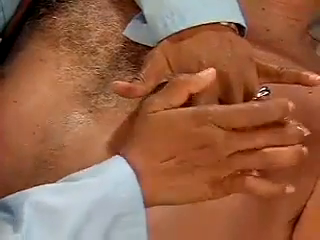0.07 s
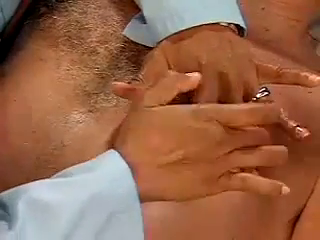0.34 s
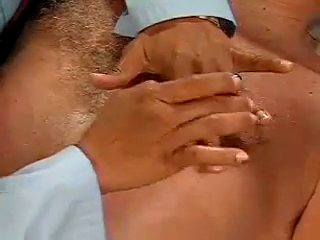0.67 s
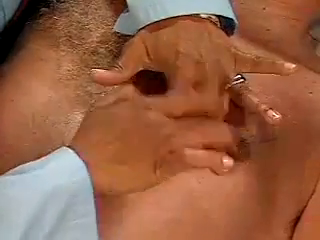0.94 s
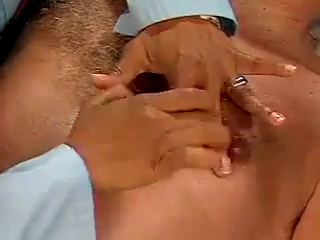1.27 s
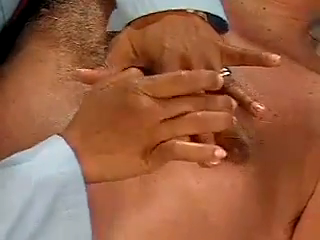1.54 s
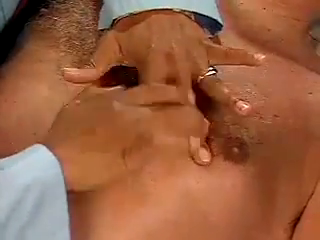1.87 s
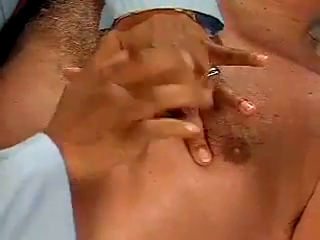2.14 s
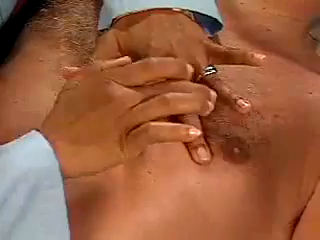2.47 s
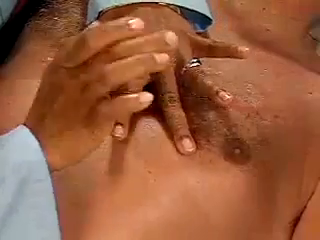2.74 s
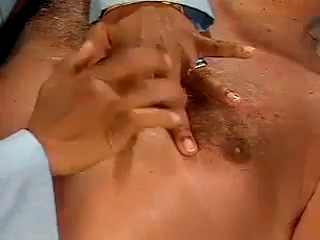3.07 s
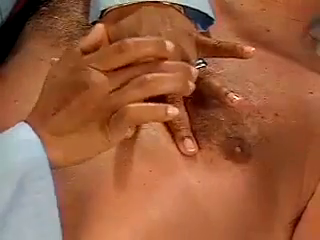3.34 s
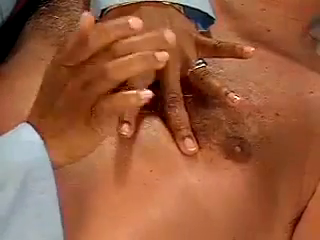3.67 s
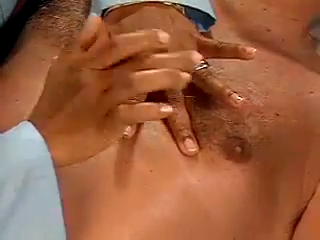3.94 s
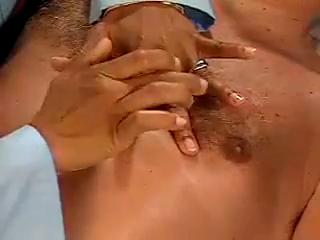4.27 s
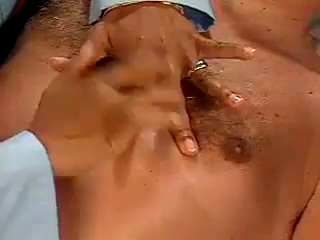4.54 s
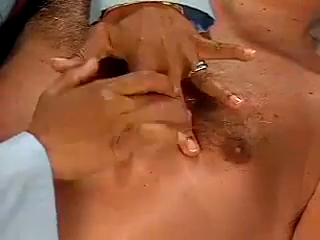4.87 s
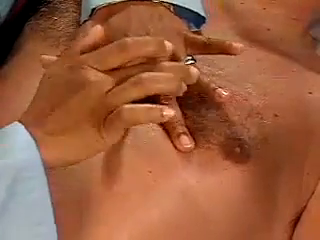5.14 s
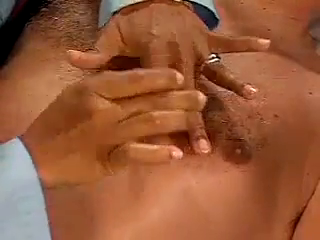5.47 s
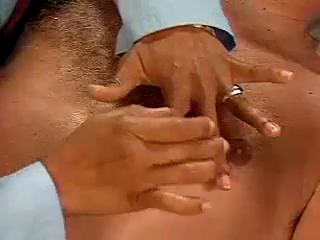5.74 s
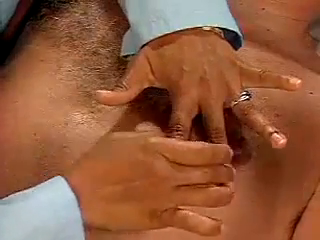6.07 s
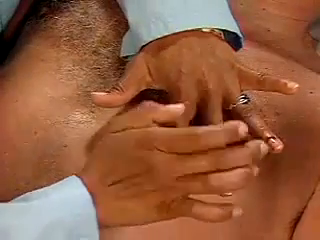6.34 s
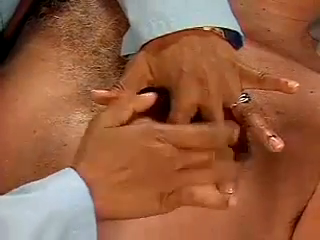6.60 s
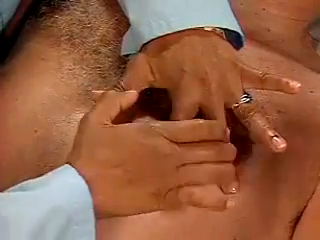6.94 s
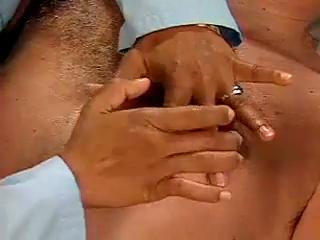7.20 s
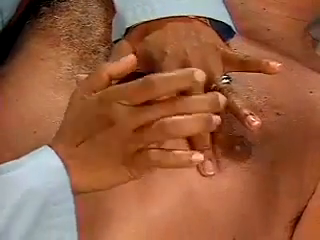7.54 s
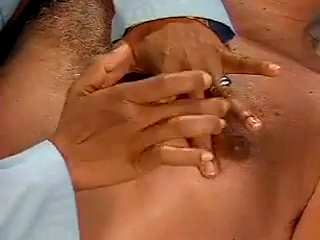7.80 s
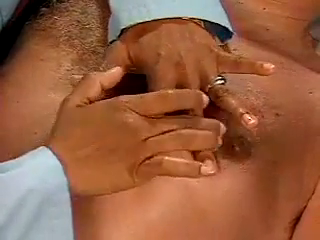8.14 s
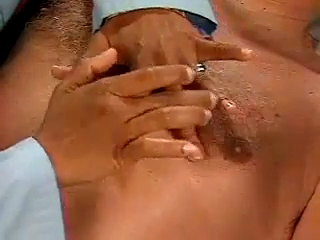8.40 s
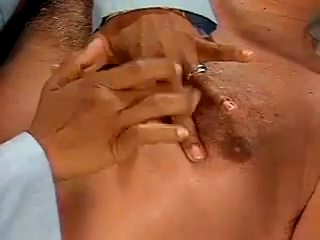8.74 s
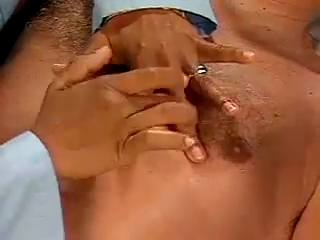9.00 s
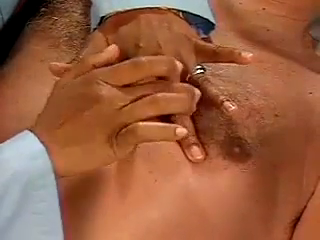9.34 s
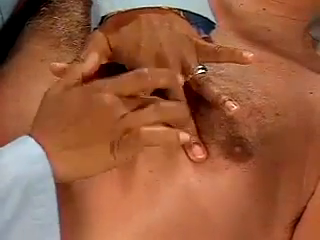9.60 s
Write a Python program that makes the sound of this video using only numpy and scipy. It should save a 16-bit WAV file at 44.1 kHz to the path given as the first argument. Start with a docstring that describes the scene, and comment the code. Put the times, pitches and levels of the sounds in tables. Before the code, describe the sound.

A fingertip strikes a finger laid flat on a bare chest, heard close in a small quiet room. One tap is followed by five quick pairs, a short pause, then four more pairs. Each tap combines a light skin snap, a bony knock and a hollow thump. Fingers occasionally brush together, and a hand and cotton cuff rub faintly between taps. Ventilation rumbles steadily underneath.

```python
"""Chest percussion in a small quiet room.

A fingertip strikes a finger laid flat on the ribs, mostly in pairs of taps. Each tap is a skin snap,
a bony knock and a hollow thump of chest wall and lung. Fingers brush as they lift; hand and cuff rub
on the way to the next spot. Ventilation rumbles steadily underneath."""
import sys
import numpy as np
from scipy import signal
from scipy.fft import rfft, irfft
from scipy.io import wavfile

SR = 44100
rng = np.random.default_rng(int(sys.argv[2]) if len(sys.argv) > 2 else 0)


def log_audio(samples):
    """Write samples as a 16-bit WAV file to the path given in sys.argv[1]."""
    # one column per channel
    frames = np.atleast_2d(samples).T
    # limit to full scale, then quantise
    limited = np.clip(frames, -1, 1)
    pcm = np.round(limited * 32767).astype(np.int16)
    wavfile.write(sys.argv[1], SR, pcm)


N = 435708
TIME_S = np.arange(N) / SR
CUTOFF_HZ = 9400

# noise spectra: (frequency [Hz], relative density [dB])
RUMBLE_SPECTRUM = [(20, -31.5), (35, -23), (48, -21), (58, -6), (74, -5.5), (88, 1), (104, -3), (122, -2.5),
                   (146, -11), (178, -2.5), (203, -7.5), (225, -8), (255, -16), (290, -22)]  # ventilation in the low room modes
AIR_SPECTRUM = [(290, -2.5), (325, -0.5), (410, -8.5), (520, -13.5), (720, -17), (1000, -22.5), (1600, -27),
                (2500, -35), (3800, -41.5), (5300, -45.5), (7800, -52), (9500, -68)]  # air rush above the rumble
CUFF_SPECTRUM = [(2600, -1.5), (4000, 3.5), (5200, 1.5), (7000, -6), (9000, -20)]  # cotton cuff
SLIDE_SPECTRUM = [(600, -4.5), (1300, 3.5), (2000, 0), (2800, -4), (3700, -19), (5200, -15.5), (9000, -36)]  # hand on chest
BRUSH_SPECTRUM = [(300, 5), (600, 2.5), (1050, 6.5), (1600, -16.5), (3000, -4.5), (4200, -16)]  # finger on finger
SNAP_SPECTRUM = [(700, -18), (1300, 11), (2000, 4), (3200, -4), (4500, -12), (6500, -16), (9000, -37.5)]  # skin striking skin
AFTER_BURST_SPECTRUM = [(900, -5), (1500, 5), (2400, 3.5), (3500, -4.5), (5500, -11.5), (7000, -13),
                        (9000, -29.5)]  # faint bright burst about 14 ms after each tap, like a short echo
# room tail spectra: (frequency [Hz], relative density [dB])
TAP_TAIL_SPECTRUM = [(60, -9), (120, -4.5), (200, -4), (400, 4), (800, -8.5), (1500, 1.5), (3000, -3),
                     (8000, -0.5)]
BRUSH_TAIL_SPECTRUM = [(300, 3), (1000, 1.5), (3000, -3), (4500, -10.5), (8000, -10)]
LATE_TAIL_SPECTRUM = [(250, 1.5), (450, 1.5), (800, -6), (1300, -10.5)]
# duct and room standing waves: (frequency [Hz], width [Hz], gain [dB])
DUCT_ROOM_MODES = [(87.6, 18, -2.5), (106.6, 14, 3.5), (117.2, 8.6, 1), (174.5, 10, 4.5), (220, 14, 0.5),
                   (260.5, 15, 4.5), (302, 21, 0), (331, 3, 7), (398.3, 8.8, 6), (539.5, 41, 7.5),
                   (678.7, 27, 8), (761, 41, 3.5), (878, 17, 6)]
# peak and dips that colour the knock: (frequency [Hz], width [Hz], gain [dB])
KNOCK_COLOUR_BANDS = [(590, 43, -1), (864, 250, 2), (1410, 160, -6)]
# slides to the next spot: (start [s], length [s], skin friction [dB], cuff hiss [dB])
HAND_MOVES = [(0.423, 0.43, -52.5, -66), (1.43, 0.41, -53, -67), (2.479, 0.33, -54.5, -66),
              (4.98, 0.22, -56.5, -68.5), (5.378, 0.46, -52.5, -64), (5.86, 0.34, -56, -71.5),
              (7.116, 0.25, -53, -63.5), (8.142, 0.32, -54.5, -62.5)]
# finger rubs: (start [s], length [s], friction [dB], hiss [dB], hiss centre [Hz])
FINGER_BRUSHES = [(0.052, 0.017, -54, -58.5, 6100), (0.333, 0.0073, -39, -49.5, 5930),
                  (1.032, 0.031, -44.5, -58.5, 6500), (1.103, 0.014, -55, -62, 6440),
                  (1.79, 0.014, -45, -61, 4870), (2.279, 0.012, -19.5, -29, 5400),
                  (2.9, 0.0039, -41, -64, 5600), (2.922, 0.02, -29.5, -41.5, 4830),
                  (9.873, 0.0054, -26.5, -40, 6460)]
# taps: (time [s], knock [dB], knock [Hz], chest wall [dB], lung [dB], finger pad [dB],
#        nail tick [dB], nail tick [Hz])
FINGER_TAPS = [(0.263, -15, 885, -15, -13, -11, -27, 1900),
               (1.0102, -10.5, 820, -8.5, -16.5, -13.5, -44, 3000),
               (1.3001, -13, 740, -12.5, -16, -13.5, -29.5, 2100),
               (1.9284, -15.5, 790, -14.5, -14, -20.5, -37, 5670),
               (2.2426, -11, 760, -9, -8, -20.5, -30, 1900), (2.889, -26.5, 680, -27, -8.5, -12, -36, 3000),
               (3.1683, -29.5, 950, -18.5, -13, -18, -50, 1990),
               (3.8177, -15, 795, -14.5, -7, -13, -43, 2980),
               (4.1102, -10, 816, -12.5, -8.5, -14, -44, 6700),
               (4.619, -20.5, 1130, -28, -12, -16.5, -31, 3030),
               (4.8979, -12.5, 710, -16, -5, -28.5, -40, 2760),
               (6.648, -10, 755, -14.5, -9.5, -18, -28.5, 2100),
               (6.9448, -9, 760, -11, -9, -17, -21.5, 2100),
               (7.6663, -7.5, 706, -12, -7.5, -13.5, -26, 2000),
               (7.9551, -8.5, 690, -13, -6.5, -31, -33, 2300),
               (8.6464, -12, 840, -20.5, -11.5, -20, -37, 2700),
               (8.9184, -11.5, 820, -17.5, -5.5, -11, -34.5, 2800),
               (9.583, -36, 760, -28, -5, -24, -60, 2470), (9.8594, -14.5, 860, -20, -16, -13, -21, 2900)]


def from_db(db):
    """Decibels to gain."""
    return 10 ** (np.asarray(db) / 20)


def unit_rms(x):
    """Scale to unit rms."""
    return x / np.sqrt(np.mean(x ** 2) + 1e-20)


def noise(spectrum, size=N):
    """Unit-rms shaped noise, falling steeply beyond the spectrum's ends."""
    hz, db = np.transpose(spectrum)
    bin_hz = np.maximum(np.fft.rfftfreq(size, 1 / SR), 1)
    skirts = np.minimum(bin_hz / hz[0], 1) ** 6 * np.minimum(hz[-1] / bin_hz, 1) ** 16
    gain = from_db(np.interp(np.log(bin_hz), np.log(hz), db)) * skirts
    return unit_rms(irfft(rfft(rng.standard_normal(size)) * gain, size))


def flutter(depth_db, low_hz, high_hz, size=N):
    """Randomly fluctuating gain, unit rms."""
    return unit_rms(from_db(depth_db * noise([(low_hz, 0), (high_hz, 0)], size)))


def add(track, start_s, sound):
    """Mix a sound in at start_s."""
    start = max(round(start_s * SR), 0)
    track[start:start + len(sound)] += sound[:N - start]


def swell(t, peak_s, order=1):
    """Rise to 1 at peak_s, then decay; higher order is narrower."""
    return (t / peak_s * np.exp(1 - t / peak_s)) ** order


def mode(t, hz, peak_s, order=1):
    """Damped resonance, driven through soft tissue so it builds gradually."""
    return swell(t, peak_s, order) * np.sin(2 * np.pi * hz * t)


def burst(t, spectrum, peak_s):
    """Short swell of shaped noise."""
    return swell(t, peak_s, order=2) * noise(spectrum, len(t))


def stroke(start_s, length_s, attack_s=0.066, sag_db_per_s=6.5, release_s=0.25):
    """Envelope of one hand move: speeds up, slows, comes to rest."""
    t = np.maximum(TIME_S - start_s, 0)
    attack = np.minimum(t / attack_s, 1)
    hold = from_db(-sag_db_per_s * np.minimum(t, length_s))
    return attack * hold * np.exp(-np.maximum(t - length_s, 0) / release_s)


def friction_gain(moves, rest_db):
    """Power sum of the resting level and the moves (start [s], length [s], level [dB])."""
    power = sum((from_db(db) * stroke(start_s, length_s)) ** 2 for start_s, length_s, db in moves)
    return np.sqrt(from_db(rest_db) ** 2 + power)


def standing_waves(x):
    """Duct and room modes lift or dip narrow bands."""
    bin_hz = np.fft.rfftfreq(N, 1 / SR)
    gain_db = sum(db / (1 + (2 * (bin_hz - hz) / width_hz) ** 2) for hz, width_hz, db in DUCT_ROOM_MODES)
    return irfft(rfft(x) * from_db(gain_db), N)


def ventilation(rumble_db=-22, air_db=-40):
    """Moving air: a wavering rumble under a softer steady rush."""
    waver = flutter(depth_db=1.2, low_hz=1.6, high_hz=12)
    rumble = from_db(rumble_db) * waver * noise(RUMBLE_SPECTRUM)
    return standing_waves(rumble + from_db(air_db) * noise(AIR_SPECTRUM))


def cuff():
    """Cotton hisses as the arm travels, faintly at rest."""
    moves = [(start_s, length_s, db) for start_s, length_s, _, db in HAND_MOVES]
    hiss = friction_gain(moves, rest_db=-77.5) * noise(CUFF_SPECTRUM)
    return hiss * flutter(depth_db=2.5, low_hz=15, high_hz=300)


def hand_slide():
    """The flat hand catches and slips on skin and hair between pairs of taps."""
    moves = [(start_s, length_s, db) for start_s, length_s, db, _ in HAND_MOVES]
    rub = friction_gain(moves, rest_db=-64.5) * noise(SLIDE_SPECTRUM)
    return rub * flutter(depth_db=1.2, low_hz=13, high_hz=300)


def brushes(hiss_spread_octaves=0.2):
    """Short grainy rubs as the striking hand lifts; they stop when the fingers part."""
    out, t = np.zeros(N), TIME_S[:SR // 8]
    hz = np.geomspace(2500, CUTOFF_HZ, 12)
    for start_s, length_s, friction_db, hiss_db, hiss_hz in FINGER_BRUSHES:
        band_db = -10 * np.log10(1 + (np.log2(hz / hiss_hz) / hiss_spread_octaves) ** 4)
        friction = from_db(friction_db) * noise(BRUSH_SPECTRUM, len(t))
        hiss = from_db(hiss_db) * noise(np.c_[hz, band_db], len(t))
        contact = np.sqrt(np.abs(np.sin(np.pi * np.minimum(t / length_s, 1))))
        grain = flutter(depth_db=6.0, low_hz=100, high_hz=910, size=len(t))
        add(out, start_s, (friction + hiss) * contact * grain)
    return out


def finger_knock(t, knock_db, knock_hz, pad_db, ring_db=-11):
    """Finger bones knock, ring a few cycles and drive the resting finger's flesh."""
    knock = from_db(knock_db) * mode(t, knock_hz, peak_s=0.001, order=7.1)
    ring = from_db(knock_db + ring_db) * mode(t, knock_hz, peak_s=0.0016, order=2)
    flesh = from_db(pad_db) * mode(t, hz=327, peak_s=0.0014)
    return knock + ring - flesh  # neighbouring modes alternate in sign


def chest_thump(t, wall_db, lung_db, heave_db, pitch_spread=0.041):
    """Wall and air-filled lung ring, pitch varying per tap; the whole chest heaves slowly."""
    pitch = 1 + pitch_spread * rng.standard_normal()
    wall = from_db(wall_db) * mode(t, hz=pitch * 116, peak_s=0.012)
    lung = from_db(lung_db) * mode(t, hz=pitch * 189.1, peak_s=0.006)
    heave = from_db(heave_db) * mode(t, hz=46.3, peak_s=0.033, order=3)
    return lung - wall + heave


def taps(snap_lead_s=0.001312, tick_lead_s=0.00023, after_burst_lag_s=0.0095):
    """Skin and nail land, the finger knocks, the chest thumps; a faint bright burst follows."""
    out, t = np.zeros(N), TIME_S[:SR // 5]
    firm_lung_db, firm_pad_db, firm_tick_db = -9, -18, -35  # levels of a firm tap
    for time_s, knock_db, knock_hz, wall_db, lung_db, pad_db, tick_db, tick_hz in FINGER_TAPS:
        heave_db = -31 + 0.4 * (lung_db - firm_lung_db)
        snap_db = -33.5 + 0.38 * (tick_db - firm_tick_db)
        after_burst_db = -48.5 + 0.67 * (pad_db - firm_pad_db)
        add(out, time_s, finger_knock(t, knock_db, knock_hz, pad_db))
        add(out, time_s, chest_thump(t, wall_db, lung_db, heave_db))
        tick = from_db(tick_db) * mode(t, tick_hz, peak_s=0.00069, order=2)
        snap = from_db(snap_db) * burst(t, SNAP_SPECTRUM, peak_s=0.0021)
        after_burst = from_db(after_burst_db) * burst(t, AFTER_BURST_SPECTRUM, peak_s=0.005)
        add(out, time_s - tick_lead_s, tick)
        add(out, time_s - snap_lead_s, snap)
        add(out, time_s + after_burst_lag_s, after_burst)
    return out


def knock_colour(x):
    """A peak near 860 Hz and dips either side make the knock narrower and more pitched."""
    for hz, width_hz, db in KNOCK_COLOUR_BANDS:
        b, a = signal.iirpeak(hz, hz / width_hz, fs=SR)
        x = x + (from_db(db) - 1) * signal.lfilter(b, a, x + 1e-18)
    return x


def room(x, spectrum, tail_db, t60_s, build_s=0.0073):
    """Diffuse reflections: a short noise tail, wet only."""
    t = TIME_S[:SR // 2]
    build = 1 - np.exp(-(t / build_s) ** 2)
    tail = noise(spectrum, len(t)) * from_db(-60 * t / t60_s) * build
    return from_db(tail_db) * signal.fftconvolve(x, tail / np.linalg.norm(tail))[:N]


def scene():
    """Taps and brushes with room tails, over hand friction and ventilation; mono."""
    knocks, rubs = knock_colour(taps()), brushes()
    early = room(knocks, TAP_TAIL_SPECTRUM, tail_db=-16.0, t60_s=0.18)
    early += room(rubs, BRUSH_TAIL_SPECTRUM, tail_db=-16.5, t60_s=0.31)
    late = room(knocks + rubs, LATE_TAIL_SPECTRUM, tail_db=-28.0, t60_s=0.3, build_s=0.03)
    return (knocks + rubs + early + late + hand_slide() + cuff() + ventilation())[None]


def record(dry):
    """Steep low-pass cuts the top treble."""
    return signal.sosfilt(signal.ellip(10, 0.3, 80, CUTOFF_HZ, fs=SR, output="sos"), dry)


dry = scene()
out = record(dry)
log_audio(out)
```